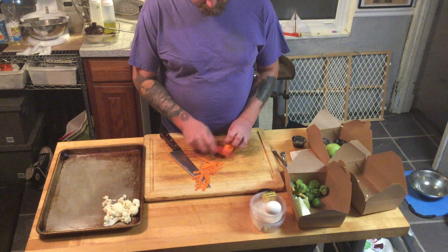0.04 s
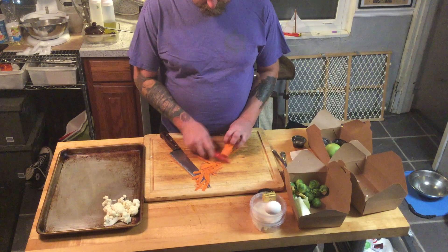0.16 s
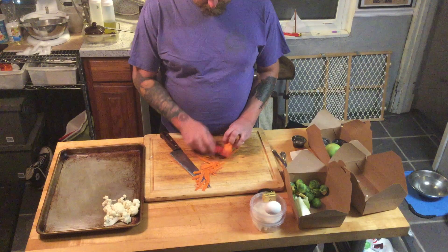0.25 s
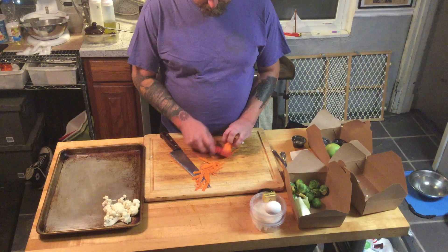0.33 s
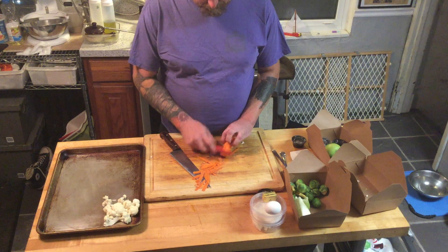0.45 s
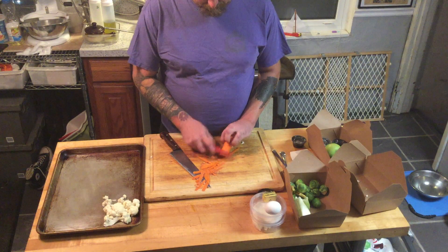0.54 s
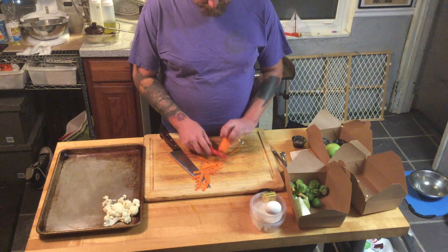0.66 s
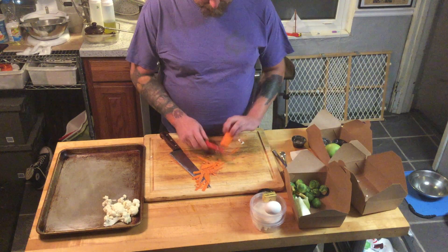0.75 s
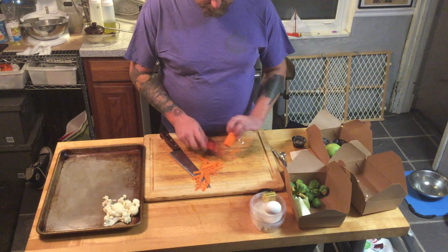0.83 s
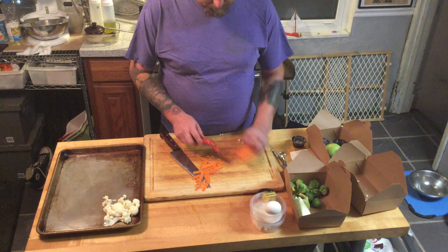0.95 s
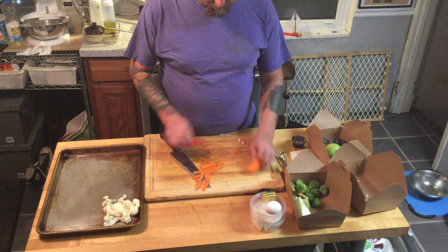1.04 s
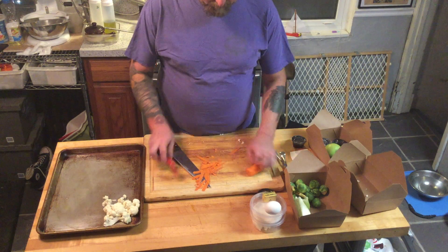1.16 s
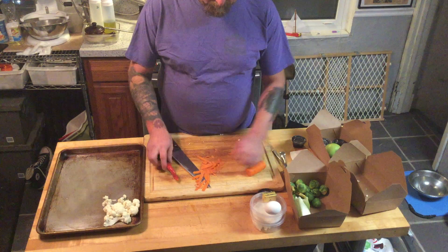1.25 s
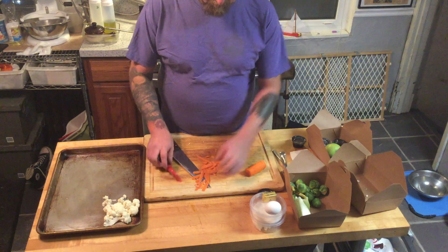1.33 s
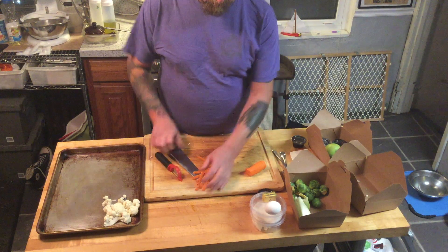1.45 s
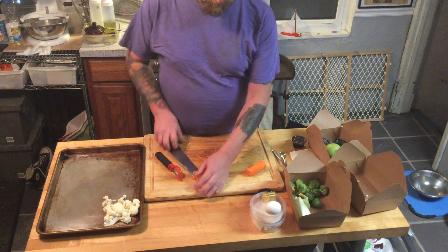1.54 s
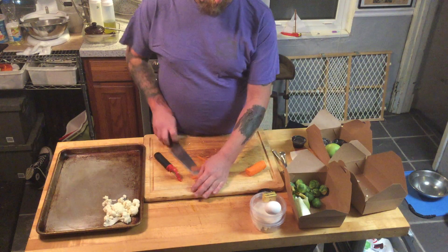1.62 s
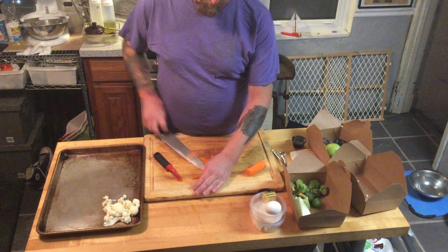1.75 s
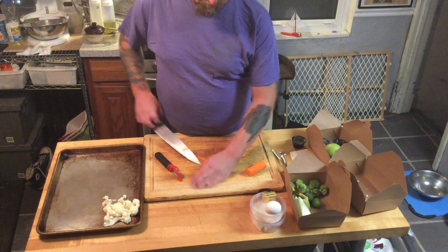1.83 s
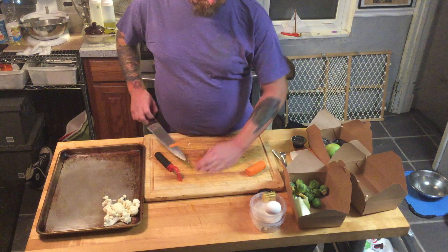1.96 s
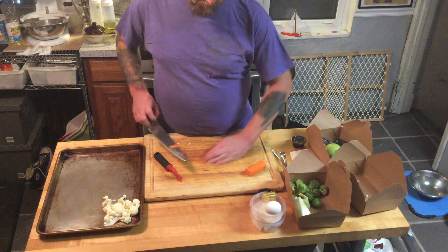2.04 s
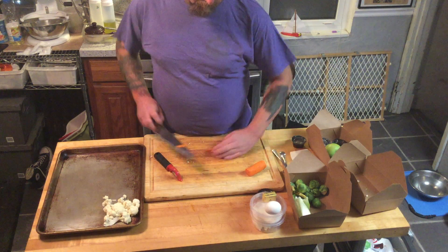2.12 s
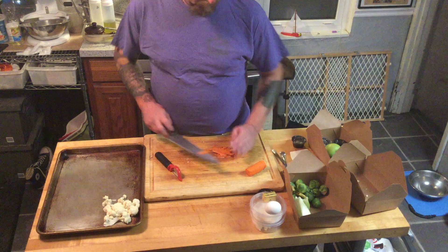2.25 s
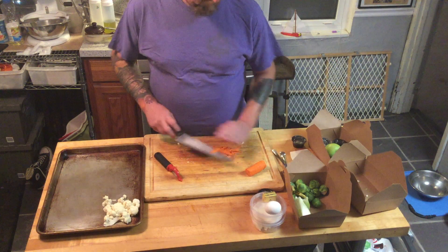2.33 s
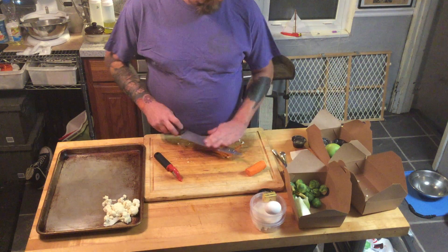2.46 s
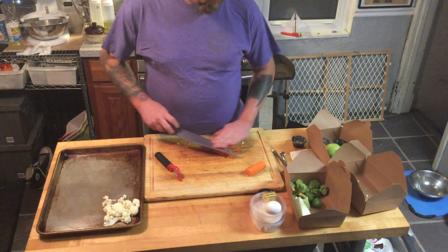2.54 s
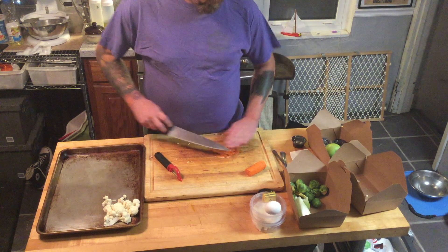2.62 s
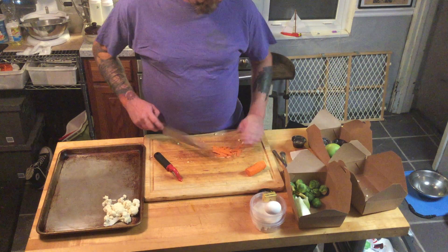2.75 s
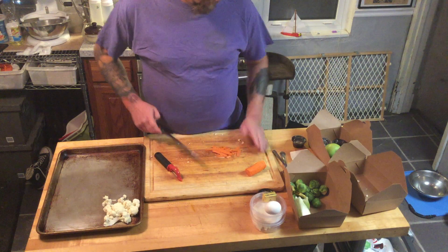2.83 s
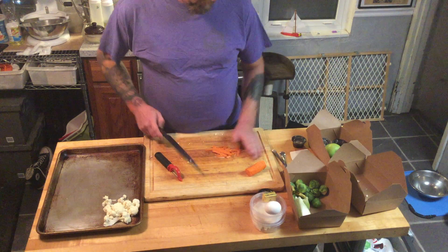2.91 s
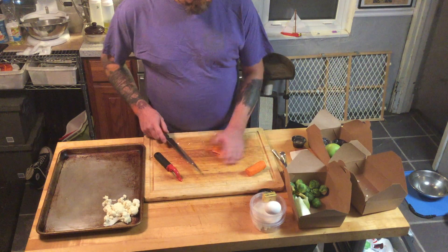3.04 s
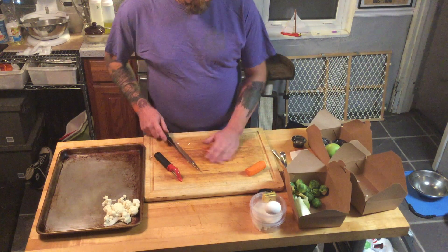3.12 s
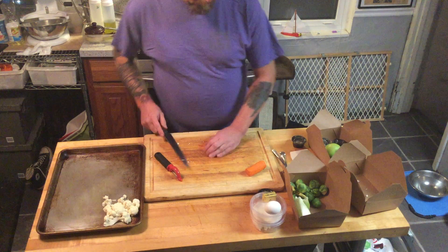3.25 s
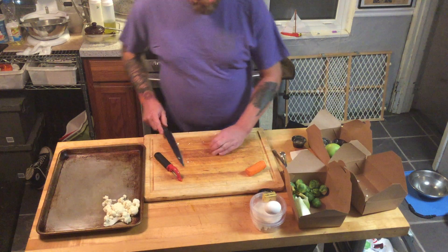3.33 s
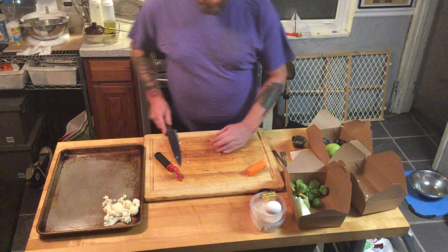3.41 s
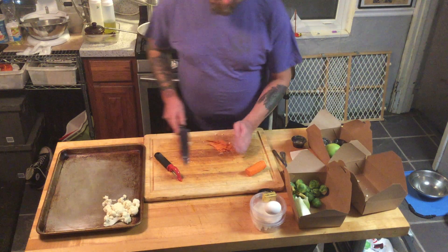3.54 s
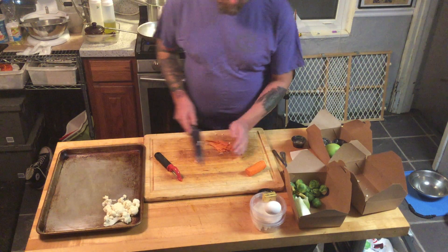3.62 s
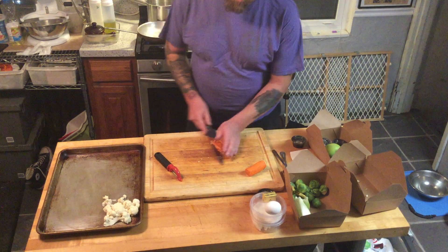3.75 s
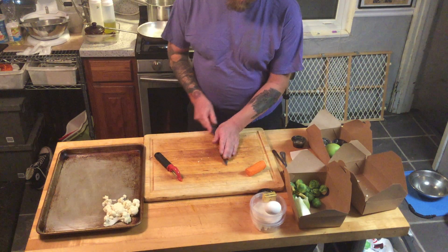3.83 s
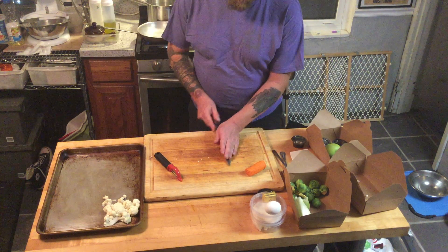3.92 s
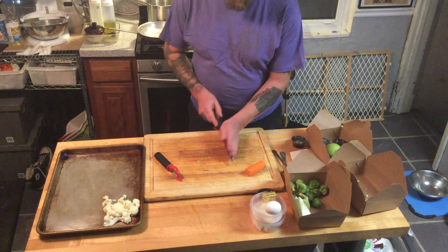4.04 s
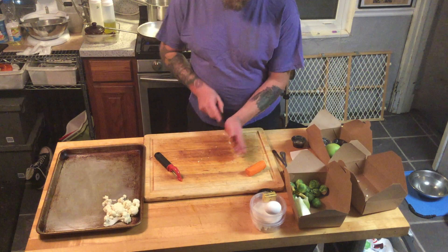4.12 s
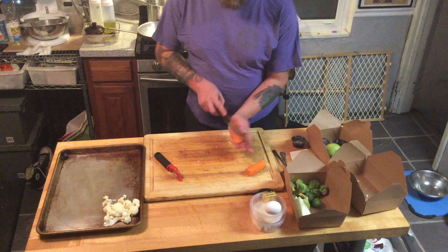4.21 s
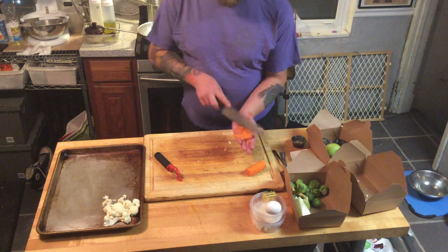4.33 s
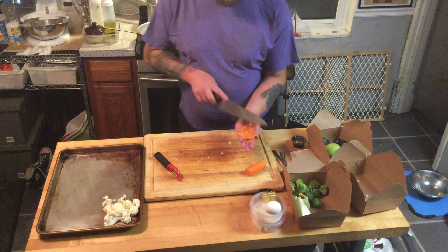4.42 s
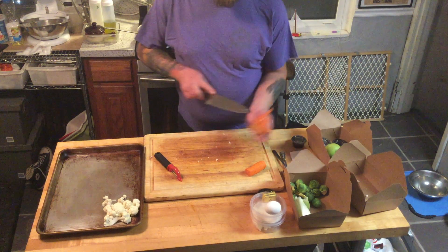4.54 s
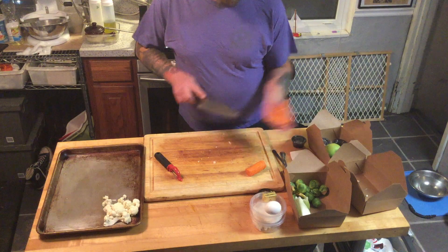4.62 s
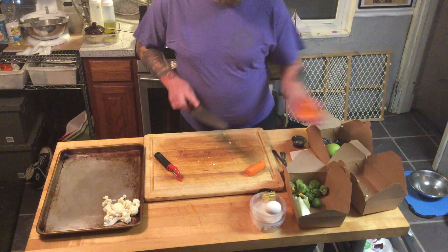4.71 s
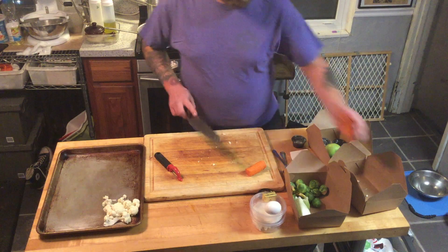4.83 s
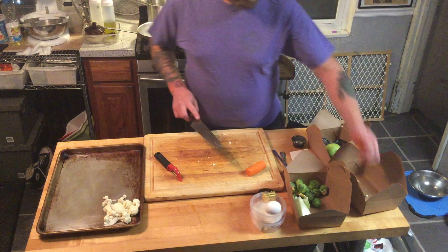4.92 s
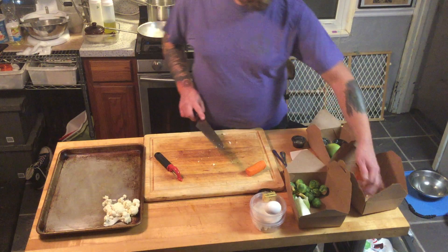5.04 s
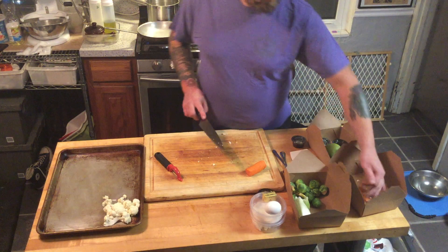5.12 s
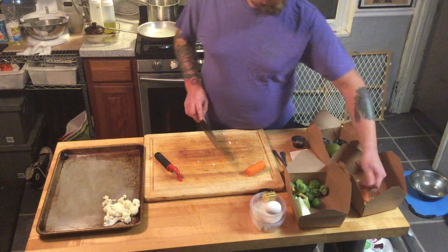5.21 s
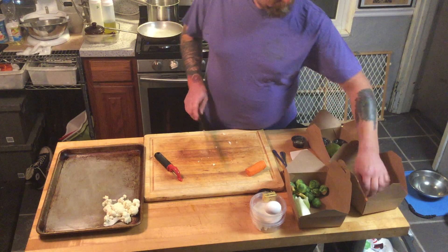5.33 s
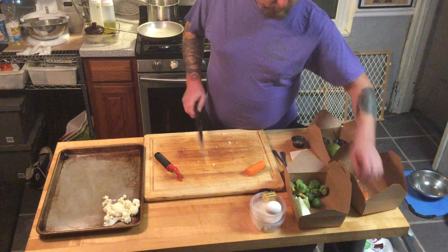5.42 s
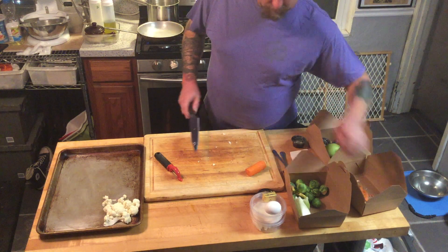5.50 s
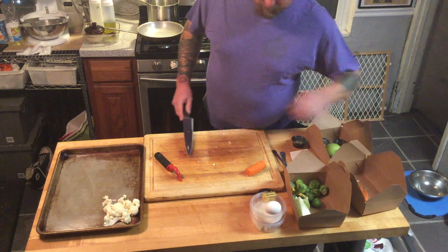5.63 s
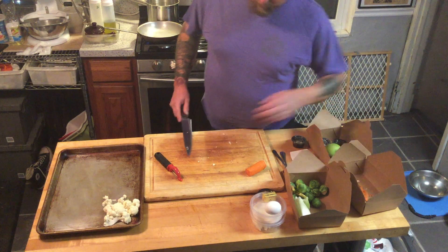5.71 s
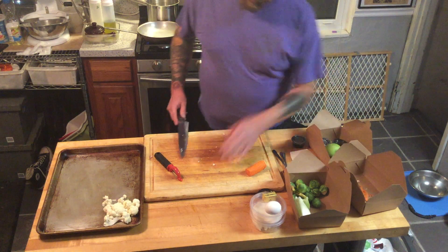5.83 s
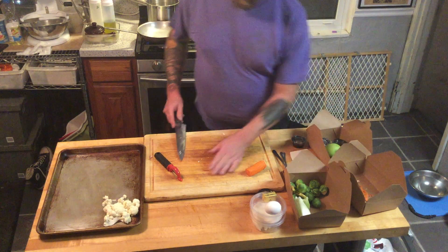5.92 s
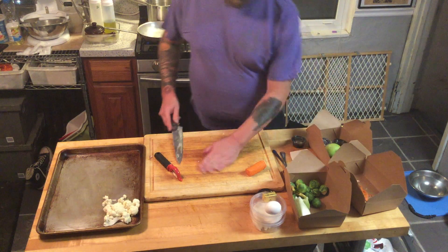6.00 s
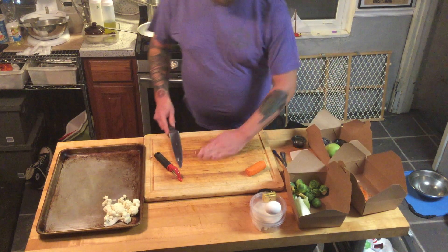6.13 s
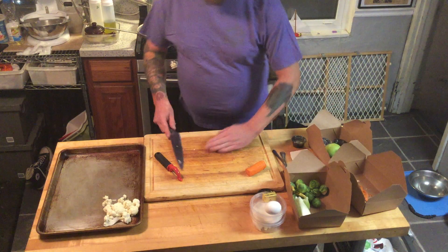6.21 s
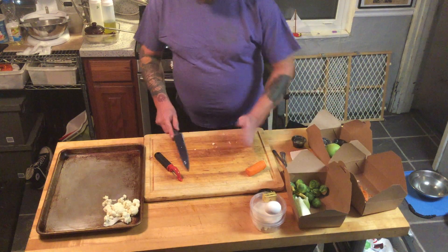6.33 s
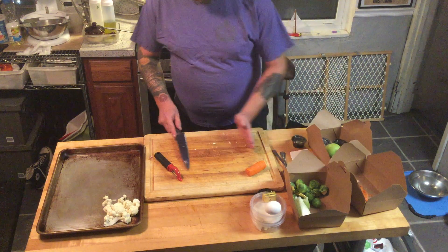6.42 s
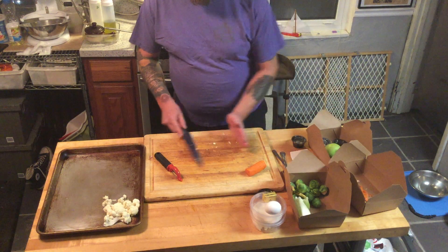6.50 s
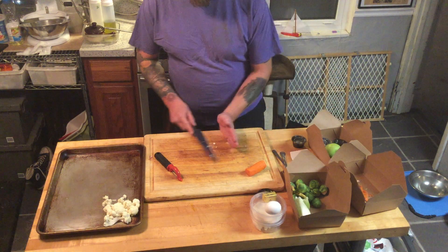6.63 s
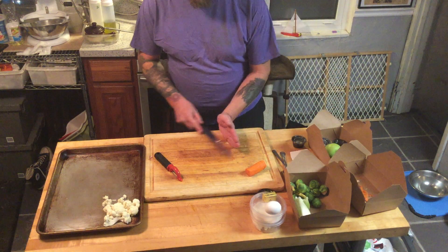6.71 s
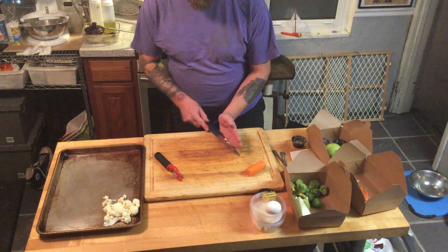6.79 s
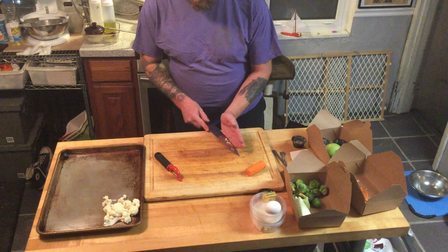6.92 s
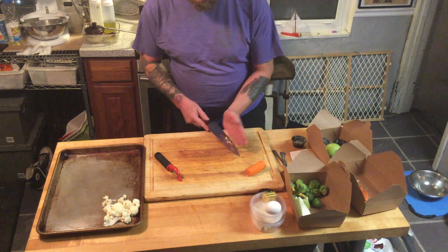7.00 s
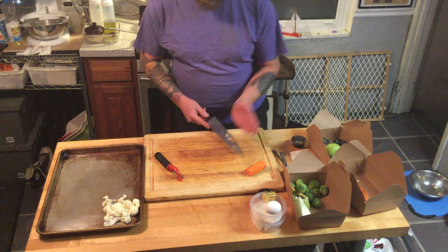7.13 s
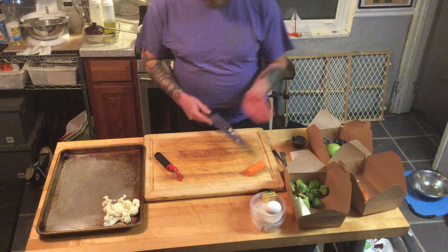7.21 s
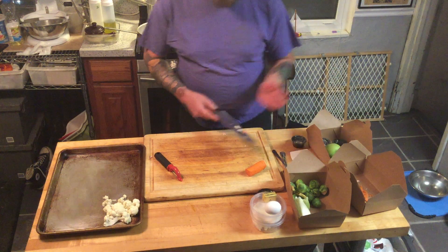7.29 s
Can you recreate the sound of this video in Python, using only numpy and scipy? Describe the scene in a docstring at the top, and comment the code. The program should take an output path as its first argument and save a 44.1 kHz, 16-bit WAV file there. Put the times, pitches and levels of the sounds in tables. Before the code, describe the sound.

A reverberant domestic kitchen with low, wavering fridge hum, soft rumble and faint air throughout. Four strong clacks of a plastic peeler with a ringing steel blade strike a wooden board at 0, 0.2, 0.4 and 0.6 seconds, the first already sounding, the later ones brighter, each with a brief rattle and short room tail. Around 1.1 to 1.2 a carrot bumps down dully; at 1.4 the peeler knocks flat and rocks to rest. Faint brushing and taps follow until 2.0, then near quiet, with soft ticking sweeps from 2.9 and a clearer tap at 3.36. A dry knife scrape runs from 3.5 to 4.0. Small handling taps lead to peelings slapping and pattering into cardboard at 5.1. Soft knocks and brushing come at 5.7 to 6.3, a short scrape at 6.3, then a stronger, gritty scrape from 6.5 to 6.9 with sharp snags, notably at 6.62 and 6.72. Hum remains.

```python
"""A peeler ends each stroke with a clack on a wooden board: short noisy blows ring its plastic body and blade.
It is laid down, and the carrot bumps down in front of that. A hand sweeps peelings as shaped, ticking noise.
A knife scrapes them up, rubbing and snagging over the board's resonances; they patter into a cardboard box.
Hard walls add a noise tail of about a third of a second. Behind it a fridge hums with wavering sines,
over filtered noise for whines, rumble and air."""
import sys
import numpy as np
from scipy import signal
from scipy.fft import rfft, irfft, next_fast_len
from scipy.io import wavfile
from scipy.ndimage import uniform_filter1d

SR = 44100
rng = np.random.default_rng(int(sys.argv[2]) if len(sys.argv) > 2 else 0)


def dump(signal):
    """Clip the signal to [-1, 1] and save it as 16-bit WAV at the path in sys.argv[1]."""
    limited = np.clip(np.atleast_2d(signal).T, -1, 1)
    pcm = np.round(limited * 32767).astype(np.int16)
    wavfile.write(sys.argv[1], SR, pcm)


N = 324554
LEAD = 2048  # samples before time zero, for the clack already ringing
M = N + LEAD
TIME = (np.arange(M) - LEAD) / SR  # seconds

# In the tables, contact_s sets the length scale of a blow and width_hz the breadth of a resonance;
# each use may stretch or shrink both. The levels of spectra and resonances are relative.

# Peeler clacks at the end of each stroke: time_s, peak_db, blade_db (relative to peak), contact_s,
# hardness_db_per_octave
CLACKS = [(-0.008, -13, -8.5, 0.0056, -1.5), (0.223, -14.5, -13.5, 0.0034, -2.5),
          (0.428, -10.5, -7, 0.0035, 4), (0.634, -11.5, -8.5, 0.0034, 4)]
# Faint ticks and short noisy swells, some just before a clack or knock:
# time_s, peak_db, body_db (relative to peak), contact_s
FAINT_TICKS = [(0.1365, -34.5, -7.5, 0.004), (0.35, -39, -22.5, 0.0046), (0.212, -39, -7, 0.0084),
               (0.416, -41.5, 7, 0.012), (0.618, -37.5, 0, 0.02), (0.903, -51.5, -0.5, 0.0088),
               (1.155, -47.5, 5, 0.02), (1.374, -49, 0, 0.017)]
# Resonances of the plastic peeler body: pitch_hz, width_hz, level_db
PEELER_MODES = [(850, 70, -6), (1152, 40, -1.5), (1294, 30, 4.5), (1410, 18, 3), (1553, 20, -0.5),
                (1760, 60, 6.5), (2003, 20, -1), (2198, 30, 5), (2460, 120, -0.5), (2618, 85, 1),
                (2965, 40, -8), (3190, 40, -10.5), (3770, 60, -14.5), (4195, 25, -18)]
# Resonances of the steel peeler blade: pitch_hz, width_hz, level_db
BLADE_MODES = [(4940, 115, -1), (6330, 51, -5.5), (6500, 19, -10.5), (8930, 110, 2), (9460, 43, 0),
               (11310, 66, 0), (12800, 22, -6), (13240, 38, -4), (14100, 51, -17)]
# The peeler is laid down and rocks to rest: time_s, peak_db, blade_db (relative to peak), contact_s
LAID_KNOCKS = [(1.387, -24.5, -26, 0.0047), (1.3915, -20.5, -17, 0.00207), (1.414, -33.5, -16, 0.0071),
               (1.43, -31, -20, 0.0058), (1.454, -39.5, -26, 0.0048)]
# Resonances of the handle flat on the board: pitch_hz, width_hz, level_db
HANDLE_MODES = [(510, 71, 0.5), (840, 32, 2), (1083, 17, -3), (1320, 20, -3), (1580, 107, 3), (1830, 57, 5),
                (2020, 89, 1), (2400, 172, 2), (2780, 46, 1), (3600, 150, -14), (3970, 52, -19)]
# Knocks on the board: time_s, peak_db, thud_db (relative to peak), hardness_db_per_octave, contact_s
KNOCKS = [(1.589, -50, 1, -13, 0.01), (1.661, -52, 3, -6, 0.004), (1.672, -42.5, -11, -16, 0.0081),
          (1.757, -52.5, -4, -17, .01), (1.765, -50, -22, 1, 0.012), (1.688, -46.5, -2, -40, 0.0056),
          (1.78, -51, -2, -12, 0.0052), (2.138, -56, -15, 0, 0.011), (2.979, -54, -20, -8, 0.016),
          (3.142, -52.5, -23, -9, 0.02), (3.36, -35.5, -12.5, 0, 0.017), (4.401, -50.5, 0.5, -8.5, 0.0098),
          (4.522, -57.5, -16, -3, 0.014), (4.633, -62.5, -15, 18, 0.0067), (4.8, -48.5, 5, 12, 0.01),
          (5.745, -42.5, -8, -22, 0.0079), (5.903, -43.5, -25, -3, 0.017)]
# Strong resonances of the board: pitch_hz, width_hz, level_db
BOARD_MODES = [(1383, 81, 10), (1555, 88, 9.5), (1732, 126, 8), (1995, 93, 11), (2040, 204, 9.5),
               (2644, 123, 9), (2930, 260, -10.5), (3304, 58, 3), (3630, 200, -16.5), (3960, 190, -11)]
# The lowest strong resonance of the board, one row: pitch_hz, width_hz, level_db
BOARD_LOWEST_MODE = (853, 190, 5.1)
# Close lowest resonances of the board under a moving edge: pitch_hz
BOARD_LOW_HZ = [770, 828, 896, 962, 1034, 1117, 1216]
# Dense small board resonances between the strong ones: frequency_hz, density_db_per_hz
WOOD_SPECTRUM = [(200, -33), (340, 0.5), (374, 2), (448, -11), (556, 0.5), (760, -7.5), (932, 6), (1250, 3),
                 (1600, -8), (1850, -5), (3300, -7.5), (6000, -36), (7800, -63), (13200, -120)]
# Knife edge dragged over the board, one list a scrape: time_s, level_db, hiss_db
SCRAPES = [
    [(3.5, -66, -83), (3.566, -57.5, -71.5), (3.64, -44, -62.5), (3.744, -44, -66.5), (3.778, -52, -67),
     (3.83, -50.5, -68.5), (3.994, -67.5, -74), (4.05, -80, -85)],
    [(6.28, -61, -78), (6.31, -54, -70), (6.35, -56.5, -75), (6.41, -84, -91.5)],
    [(6.468, -69, -80), (6.492, -45, -62), (6.54, -38.5, -51.5), (6.618, -38, -57), (6.68, -43, -61.5),
     (6.722, -39.5, -56.5), (6.83, -44.5, -66.5), (6.9, -70, -98)],
]
# Resonances favoured under the travelling edge: time_s, low_hz, low_db, upper_hz
EDGE_PATH = [(3.5, 950, -17, 1770), (3.62, 935, -9, 1690), (3.75, 914, -11, 1510), (3.86, 925, -11, 1560),
             (3.92, 930, -26, 2600), (6.279, 910, -7, 2050), (6.41, 900, -17, 2050), (6.48, 950, -22, 1750),
             (6.56, 930, -10, 1790), (6.66, 980, -11.5, 1700), (6.74, 980, -13.5, 1400),
             (6.79, 1110, -11, 1400), (6.82, 1120, -9, 3200), (6.9, 1110, -9, 2680)]
# The edge snags on the grain: time_s, peak_db, contact_s
SNAGS = [(6.482, -49, 0.00293), (6.562, -36, 0.0017), (6.587, -38, .002), (6.6225, -25, 0.00055),
         (6.657, -33, 0.0016), (6.715, -26, .0008), (6.76, -30, 0.0018)]
# Hiss of scraping and brushing: frequency_hz, density_db_per_hz
HISS_SPECTRUM = [(1760, -40), (3000, -9), (3970, -8), (5290, -12.5), (7250, -14.5), (8820, -12.5),
                 (12400, -16.5), (15300, -19), (16000, -23)]
# Hand and peelings brush the board: start_s, rise_s, hold_s, fall_s, level_db, hiss_db, rasp_db
SWEEPS = [(1.656, 0.0039, 0.022, 0.02, -59.5, -68, -60.5), (1.68, 0.012, 0.06, 0.17, -75, -64, -103),
          (1.77, 0.15, 0.16, 0.24, -69.5, -73.5, -97), (2.86, 0.068, .01, .08, -71.5, -76, -76),
          (2.92, 0.052, 0.026, 0.12, -67.5, -71, -88), (3.0, 0.064, 0.038, 0.4, -71, -75, -84),
          (3.17, 0.082, 0.068, 0.1, -77, -74, -66), (3.33, 0.029, 0.046, .04, -71, -73, -80),
          (4.49, 0.047, 0.019, .12, -75.5, -70.5, -98), (4.765, 0.054, 0.048, 0.11, -70.5, -71.5, -65.5),
          (5.733, 0.0055, 0.0029, 0.18, -65, -74.5, -65), (5.896, 0.012, 0.003, 0.063, -51.5, -76, -64),
          (5.95, 0.068, 0.065, 0.13, -75, -77.5, -90), (6.04, 0.11, 0.11, 0.22, -71.5, -73.5, -79)]
# Sound of skin and peelings on wood: frequency_hz, density_db_per_hz
BRUSH_SPECTRUM = [(290, -40), (500, 5), (677, -9), (741, -29), (956, -2), (1150, -7), (2600, -7.5),
                  (3380, -60), (5720, -120)]
# Fingers wipe the knife blade: start_s, rise_s, hold_s, fall_s, level_db
WIPES = [(2.36, 0.022, 0.55, .05, -77)]
# Resonances of the knife blade: pitch_hz, width_hz, level_db
KNIFE_MODES = [(1746, 39, 3.5), (2040, 31, -15), (3060, 120, -12), (3350, 31, -6), (3540, 52, -4),
               (4640, 64, -9)]
# The carrot bumps down, tip first: start_s, rise_s, hold_s, fall_s, level_db, bass_db, hiss_db
CARROT_BUMPS = [(1.102, 0.017, 0.027, 0.081, -49, -45, -81), (1.118, 0.039, 0.022, 0.052, -42.5, -37, -73),
                (1.19, 0.0093, 0.0097, 0.048, -52.5, -54, -71)]
# Bumping on wood: frequency_hz, density_db_per_hz
BUMP_SPECTRUM = [(320, -36), (550, -35.5), (728, -5), (963, -9), (1440, -7.5), (1520, -8.5), (3000, -22),
                 (6000, -44), (7800, -80), (13200, -120)]
# Resonances behind the bass of the bumps: pitch_hz, width_hz, level_db
CARROT_MODES = [(133, 66, 4.5), (377, 81, 4), (510, 68, -2), (716, 67, 3), (1288, 98, -7.5),
                (1427, 48, -12)]
# Peelings drop into the box, first bits, slap, heap, a sharp tick, stragglers:
# start_s, rise_s, hold_s, fall_s, level_db, hiss_db
BOX_DROPS = [(5.108, 0.011, 0.009, 0.03, -55, -72), (5.1285, 0.00077, 0.0044, 0.0072, -40.5, -52),
             (5.132, 0.0047, 0.017, 0.098, -40.5, -55), (5.14, 0.0017, 0.0023, 0.0042, -56, -36),
             (5.2, 0.044, 0.028, 0.28, -60.5, -97), (5.3, 0.0018, .002, 0.0067, -51, -68)]
# Sound of the cardboard box: frequency_hz, density_db_per_hz
BOX_SPECTRUM = [(180, -35), (300, -17), (385, 1.5), (442, -3.5), (560, -2), (800, -4), (1200, 1.5),
                (2000, -5.5), (3200, -14), (5000, -26), (6500, -49), (11000, -120)]
# Echo of the kitchen: frequency_hz, time_to_fall_60_db_s, level_db
ROOM_DECAY = [(150.8, 0.32, 1), (390, 0.31, 3), (830, 0.37, 4), (2040, 0.39, -6.5), (3420, 0.39, -3.5),
              (5540, 0.38, -4.5), (14100, 0.28, 2.5)]
# Fridge compressor and mains hum: pitch_hz, level_db (rms before wavering)
HUM = [(59.2, -62), (91.5, -66.5), (118.4, -69.5), (150.7, -63), (193.8, -62), (242.2, -68), (290.7, -62),
       (371.4, -74), (581.4, -78.5), (764.4, -84.5)]
# Narrow hiss from the fridge: pitch_hz, width_hz, level_db (rms before wavering)
WHINES = [(1960, 100, -76), (4960, 120, -91), (11600, 560, -90)]
# Rumble swells when weight lands on worktop or floor: peak_s, level_db
RUMBLE_SWELLS = [(0.0, -52), (.26, -49.5), (.65, -50.5), (1.17, -51), (1.43, -58), (1.759, -55.5),
                 (3.05, -54), (3.3, -55.5), (3.829, -64), (4.85, -51), (5.18, -64.5), (5.49, -58),
                 (6.03, -51)]
# Steady air of the kitchen: frequency_hz, density_db_per_hz
AIR_SPECTRUM = [(190, -30), (330, -12), (376, -1.5), (503, -9.5), (592, -7.5), (793, -20), (860, -25),
                (1010, -15), (1450, -22), (1970, -25.5), (3370, -30), (4810, -34.5), (6140, -32.5),
                (11600, -38), (16000, -46)]

CHATTER_S, CHATTER_DB = 0.0356, -23  # fading time and level of loose parts after each clack
HEEL_S, HEEL_DB, HEEL_TILT_DB = 0.002984, 5, -5  # delay, level and extra tilt per octave of the heel
GRIP_SHARE, GRIP_DB = .005, 1.5  # random spread of pitch (share) and level from grip to grip
BOUNCE_S, BOUNCE_DB = .014, -6.5  # what is set down touches a second time
FAVOUR_DB, FAVOUR_HZ = 4.5, 170  # lift and reach of the favoured upper board resonance
SWELL_DEPTH_DB = 30  # depth from which a swell rises and to which it falls
ROOM_GAP_S, EARLY_DB, EARLY_S = 0.0022, -15.5, 0.017  # onset of the echo; level and decay of early boost
RUMBLE_DB, RUMBLE_RISE_S, RUMBLE_FALL_S = -64.5, 0.21, 0.21
DRONE_DB, AIR_DB = -60.5, -68  # broad air noise under the hum (before wavering); steady air
TOP_HZ = 16200  # upper limit of the recorder


def clacks():
    """The tip and then the duller heel strike, ringing the plastic body and steel blade; loose parts chatter."""
    out = np.zeros(M)
    for s, db, blade_db, contact, hard_db in CLACKS:
        body = vary(PEELER_MODES)
        tip_push = band(blow(contact), 460.0, 3800.0)  # a small body radiates no bass
        heel_push = np.roll(band(blow(0.49 * contact), 700.0, 6400.0), int(HEEL_S * SR))
        tip = ring(tip_push, tilt(body, hard_db), 3.3)
        heel = undb(HEEL_DB) * ring(heel_push, tilt(body, hard_db + HEEL_TILT_DB), 1.3)
        contact_noise = 1.2 * band(blow(1.8 * contact), 1000.0, 2800.0)
        add(out, s - .0025, tip + heel + contact_noise, db)

        t = np.arange(8192) / SR
        chatter = grit(5.)[:len(t)] * np.exp(-t / CHATTER_S) * np.clip(t / .008, 0, 1)
        add(out, s, ring(chatter, body, 4.4) + 1.2 * band(chatter, 1500.0, 4010.0), db + CHATTER_DB)

        blade_push = blow(.5 * contact)
        blade = ring(blade_push, vary(BLADE_MODES), 4.0) + 0.2 * band(blade_push, 4200.0, 10000.0)
        add(out, s - .001, blade, db + blade_db)
    return out


def faint_ticks():
    """Faint ticks and short noisy swells: weak blows through the blade and upper body resonances."""
    out = np.zeros(M)
    for s, db, body_db, contact in FAINT_TICKS:
        push = blow(contact)
        add(out, s - .001, ring(push, BLADE_MODES, 1.2) + 0.39 * band(push, 4300.0, 22000.0), db)
        add(out, s - .001, ring(push, PEELER_MODES[-6:], 5.0), db + body_db)
    return out


def peeler_laid_down():
    """The handle knocks flat on the wood and the blade jingles a little."""
    out = np.zeros(M)
    for s, db, blade_db, contact in LAID_KNOCKS:
        push = blow(contact)
        handle = ring(push, HANDLE_MODES, 1.9) + 0.48 * band(push, 1170.0, 3270.0)
        blade = ring(push, vary(BLADE_MODES), 1.2) + 0.65 * band(push, 4100.0, 11400.0)
        add(out, s - .001, handle, db)
        add(out, s - .001, blade, db + blade_db)
    return out


def carrot_bumps():
    """The carrot meets the wood in many small bumps that also excite low resonances."""
    bumps = dense_bumps()
    level, bass, hiss = swells(CARROT_BUMPS)
    wood = level * unit(colour(bumps, BUMP_SPECTRUM))
    thump = bass * unit(ring(bumps, CARROT_MODES, 0.52))
    return wood + thump + hiss * bump_hiss(bumps)


def board_knocks():
    """Each blow, with its second touch, rings the board over a dull thud."""
    out = np.zeros(M)
    for s, db, thud_db, hard_db, contact in KNOCKS:
        push = blow(contact) + undb(BOUNCE_DB) * np.roll(blow(contact), int(BOUNCE_S * SR))
        soft = band(band(push, 440.0, 2800.0), 440.0, 2800.0)  # wood swallows the top of the blow
        modes = tilt([BOARD_LOWEST_MODE] + BOARD_MODES, hard_db)
        add(out, s - .002, ring(soft, modes, .8) + .12 * soft, db)
        add(out, s - .002, band(band(push, 146.0, 445.0), 180.0, 465.0), db + thud_db)
    return out


def hand_sweeps():
    """Soft skin and peelings give a broad, ticking rub with a rasp and hiss on top."""
    rub = soft_rub()
    ticks = rng.standard_normal(M) * (rng.random(M) < 40 / SR)  # peelings snap loose, about 40 a second
    body = unit(colour(rub, BRUSH_SPECTRUM)) + 0.79 * unit(ring(rub, BOARD_MODES, 0.1))
    body = body + 0.5 * unit(ring(ticks, BOARD_MODES, 1.6))
    rasp = unit(band(rub, 910.0, 4180.0))
    level, hiss_level, rasp_level = swells(SWEEPS)
    return level * body + hiss_level * unit(colour(rub, HISS_SPECTRUM)) + rasp_level * rasp


def knife_wipe():
    """Fingers rubbing along the knife make its blade sing faintly."""
    return swells(WIPES)[0] * unit(ring(soft_rub(), KNIFE_MODES, 1.5))


def knife_scrapes():
    """The edge slips and snags on the grain; as it travels it favours other resonances of the board."""
    edge = grit(4.5) * undb(2.5 * walk(60) + 3.0 * walk(200))
    s, low_hz, low_db, upper_hz = np.transpose(EDGE_PATH)
    low_gain = undb(np.interp(TIME, s, low_db) + 2.0 * walk(28))
    low = low_gain * glide(edge, np.interp(TIME, s, low_hz), 74.0)

    upper = np.interp(TIME, s, upper_hz)
    high = np.zeros(M)
    for k, mode in enumerate(BOARD_MODES):
        favour = FAVOUR_DB * np.exp(-((upper - mode[0]) / FAVOUR_HZ) ** 2)
        patchy = undb(5.3 * walk(30) + favour)
        high += (-1) ** k * patchy * ring(edge, [mode], 0.75)

    wood = low + undb(-6.0) * unit(high) + undb(-9.0) * unit(colour(edge, WOOD_SPECTRUM))
    out = gain(SCRAPES, 1) * wood + gain(SCRAPES, 2) * unit(colour(edge, HISS_SPECTRUM))

    snag_modes = [(hz, 60., 0) for hz in BOARD_LOW_HZ[3:5]]
    for at, db, contact in SNAGS:
        push = band(blow(contact), 960.0, 2550.0)
        add(out, at - contact, push + .3 * ring(push, snag_modes, 0.94), db)
    return out


def box_drops():
    """Peelings landing in quick succession patter on the cardboard and rustle."""
    bumps = dense_bumps()
    patter, rustle = swells(BOX_DROPS)
    return patter * unit(colour(bumps, BOX_SPECTRUM)) + rustle * bump_hiss(bumps)


def room(x):
    """Hard walls return dense reflections, made of noise bands that each fade at their own speed."""
    t = np.arange(SR // 2) / SR
    hz, t60, db = np.transpose(ROOM_DECAY)
    tail = 0
    for f in 100 * 2 ** np.arange(8.):  # one octave at a time
        fall_s = np.interp(np.log(f), np.log(hz), t60)
        decay = undb(-60 * t / fall_s + np.interp(np.log(f), np.log(hz), db))
        tail = tail + decay * band(rng.standard_normal(len(t)), f / 2 ** .5, f * 2 ** .5)
    tail = tail * np.clip(t / ROOM_GAP_S, 0, 1) * (1 + undb(EARLY_DB) * np.exp(-t / EARLY_S))
    tail = tail / np.sqrt(np.sum(tail ** 2))  # the tail carries unit energy
    return x + signal.fftconvolve(x, tail)[:M]


def fridge():
    """Compressor and mains give sine tones that waver in level and phase, with narrow whines of noise."""
    out = np.zeros(M)
    for hz, db in HUM:
        turn = 2 * np.pi * (hz * TIME + rng.random()) + 0.72 * walk(4.8)
        out += 2 ** .5 * undb(db + 4.5 * walk(11)) * np.sin(turn)
    for hz, width, db in WHINES:
        whine = unit(ring(rng.standard_normal(M), [(hz, width, 0)], 0.91))
        out += undb(db + 4.3 * walk(3.1) + 3.1 * walk(15)) * whine
    return out


def rumble():
    """Low noise rumbles on and swells as weight lands on worktop or floor."""
    rows = [(s - RUMBLE_RISE_S, RUMBLE_RISE_S, 0, RUMBLE_FALL_S, db) for s, db in RUMBLE_SWELLS]
    level = swells(rows)[0] + undb(RUMBLE_DB + 3.0 * walk(10))
    return level * unit(band(band(rng.standard_normal(M), 49.0, 129.4), 40., 220.0))


def kitchen_air():
    """Steady shaped noise, with a slowly wavering low band under the hum."""
    air = undb(AIR_DB) * unit(colour(rng.standard_normal(M), AIR_SPECTRUM))
    drone = unit(band(rng.standard_normal(M), 115., 337.0))
    return air + undb(DRONE_DB + 2.0 * walk(1.9)) * drone


def blow(contact_s):
    """A short chattering contact that builds up and lets go, with a nearly even spectrum."""
    t = np.arange(4096) / SR / max(contact_s, .0003)
    shape = t * np.exp(-2 * t ** 2)
    x = rng.standard_normal(len(t))
    for _ in range(6):  # alternate between the wanted shape in time and a flat spectrum
        spec = rfft(shape * x / (uniform_filter1d(np.abs(x), size=32) + 1e-9))
        x = irfft(spec / np.abs(spec))
    return x * np.clip(4 * shape, 0, 1)


def grit(spiky_db):
    """Dense clicks of uneven size, as from a rough surface."""
    return unit(rng.standard_normal(M) * undb(spiky_db * np.minimum(rng.exponential(size=M), 5)))


def soft_rub():
    """Skin on a surface: grit whose level flutters at three speeds."""
    return grit(4.5) * undb(2.0 * walk(25) + 3.5 * walk(80) + 3.0 * walk(250))


def dense_bumps():
    """Many small bumps in quick succession: grit of fluttering level."""
    return grit(3.5) * undb(3.0 * walk(120))


def bump_hiss(bumps):
    """The treble rustle of the bumps."""
    return unit(band(bumps, 1600.0, 6400.0))


def ring(x, modes, widen):
    """Sum of resonances (Hz, width, dB), alternate in sign so that the valleys stay filled."""
    out = 0
    for k, (hz, width, db) in enumerate(modes):
        b, a = signal.iirpeak(hz, hz / (width * widen), SR)
        out = out + (-1) ** k * undb(db) * signal.lfilter(b, a, x)
    return out


def glide(x, hz, width):
    """A rub favours whichever of the close low board resonances lies nearest hz."""
    out = 0
    for f in BOARD_LOW_HZ:
        mode = [(f, width, 0)]
        nearness = np.exp(-((hz - f) / width) ** 2)
        out = out + nearness * unit(ring(ring(x, mode, 1), mode, 2.7))
    return out


def tilt(modes, db):
    """Harder contact favours the higher resonances: db an octave, pivoting at 1500 Hz."""
    return [(hz, width, level + db * np.log2(hz / 1500)) for hz, width, level in modes]


def vary(modes):
    """Each grip shifts the resonances a little in pitch and level."""
    shifts = rng.standard_normal((len(modes), 2))
    return [(hz * (1 + GRIP_SHARE * a), width, db + GRIP_DB * b)
            for (hz, width, db), (a, b) in zip(modes, shifts)]


def swells(rows):
    """Gains for rows (start, rise, hold, fall, dB, dB ..): one envelope a row, one output a dB column."""
    out = np.zeros((len(rows[0]) - 4, M))
    for row in rows:
        corners = np.cumsum([row[0], *np.maximum(row[1:4], .001)])
        span = slice(*np.searchsorted(TIME, corners[[0, -1]]))
        shape_db = np.interp(TIME[span], corners, [-SWELL_DEPTH_DB, 0, 0, -SWELL_DEPTH_DB])
        shape = undb(shape_db) - undb(-SWELL_DEPTH_DB)  # starts and ends at zero
        out[:, span] += np.outer(undb(row[4:]), shape)
    return out


def gain(tables, column):
    """Gain along one dB column of each table, silent outside, with 10 ms ramps at the ends."""
    out = np.zeros(M)
    for rows in tables:
        rows = np.array(rows)
        edge = np.clip(np.minimum(TIME - rows[0, 0], rows[-1, 0] - TIME) / .01, 0, 1)
        out += edge * undb(np.interp(TIME, rows[:, 0], rows[:, column]))
    return out


def walk(rate):
    """Random values around zero, a new one rate times a second, joined by straight slopes; spread near 0.5."""
    k = int(SR / rate)
    return 0.6 * uniform_filter1d(np.repeat(rng.standard_normal(M // k + 1), k), k)[:M]


def add(out, s, x, db):
    """Place x at s seconds with its peak level at db."""
    i = int(s * SR) + LEAD
    out[i:i + len(x)] += x * undb(db) / np.abs(x).max()


def colour(x, points):
    """Give x the spectrum of (Hz, dB) points."""
    size = next_fast_len(len(x))
    hz, db = np.transpose(points)
    f = np.arange(size // 2 + 1) * SR / size + 1
    shape = undb(np.interp(np.log(f), np.log(hz), db, -80, -80))
    return irfft(rfft(x, size) * shape, size)[:len(x)]


def band(x, lo_hz, hi_hz):
    """Gentle band-pass."""
    sos = signal.butter(2, [lo_hz, min(hi_hz, .45 * SR)], "band", fs=SR, output="sos")
    return signal.sosfilt(sos, x)


def undb(db):
    """Decibels to gain."""
    return 10 ** (np.asarray(db) / 20)


def unit(x):
    """Scale to rms 1."""
    return x / np.sqrt(np.mean(x ** 2))


def scene():
    """Everything on the worktop sounds through the room, over the fridge, rumble and air."""
    peeler = clacks() + faint_ticks() + peeler_laid_down()
    hands = carrot_bumps() + board_knocks() + hand_sweeps() + knife_wipe()
    clearing = knife_scrapes() + box_drops()
    background = fridge() + rumble() + kitchen_air()
    return (room(peeler + hands + clearing) + background)[None, LEAD:]


def record(dry):
    """The recorder cuts the top with a steep low-pass."""
    return signal.sosfilt(signal.ellip(10, .2, 70, TOP_HZ, fs=SR, output="sos"), dry)


dry = scene()
out = record(dry)
dump(out)
```